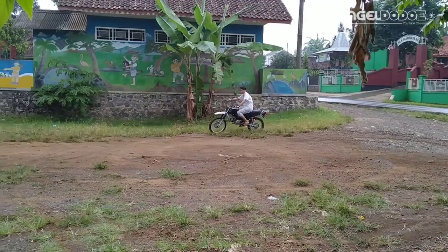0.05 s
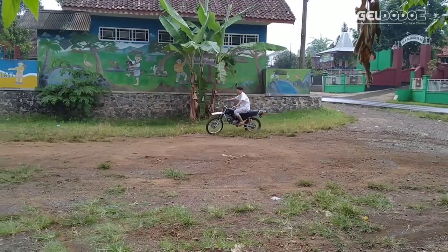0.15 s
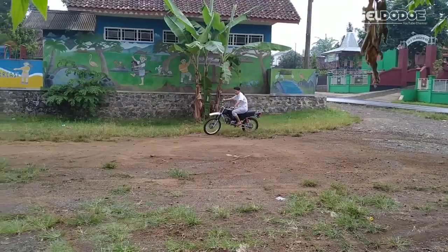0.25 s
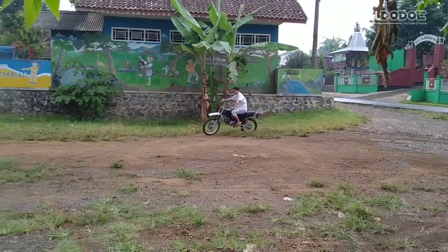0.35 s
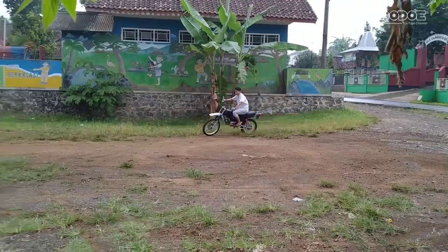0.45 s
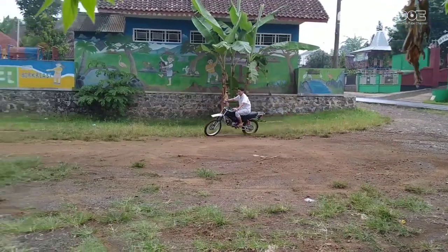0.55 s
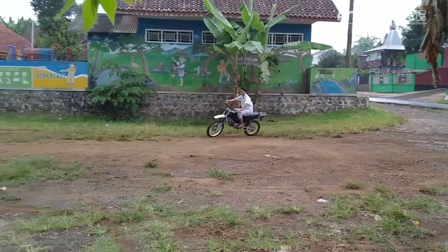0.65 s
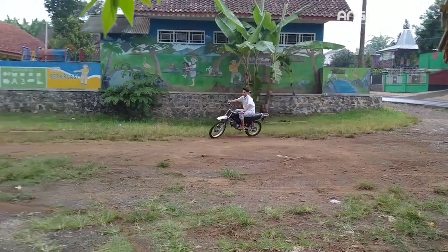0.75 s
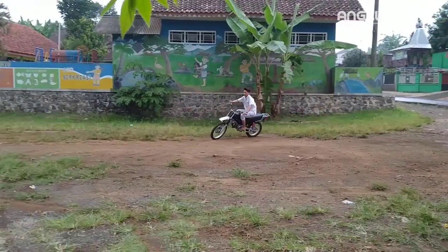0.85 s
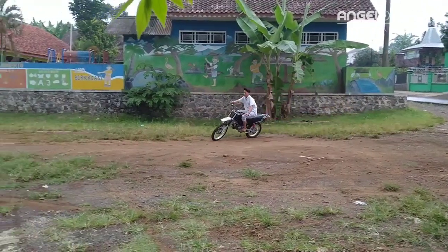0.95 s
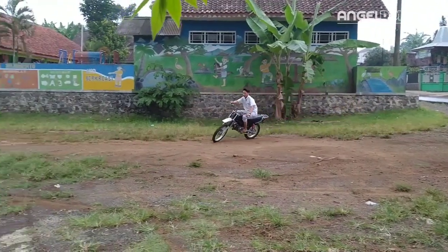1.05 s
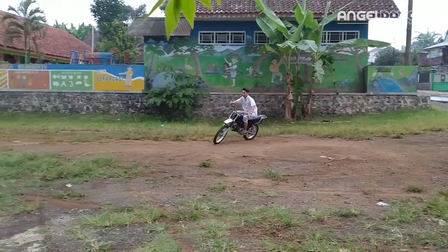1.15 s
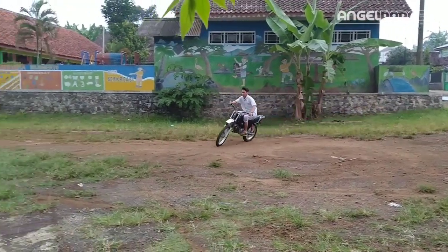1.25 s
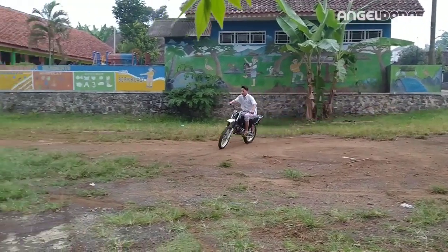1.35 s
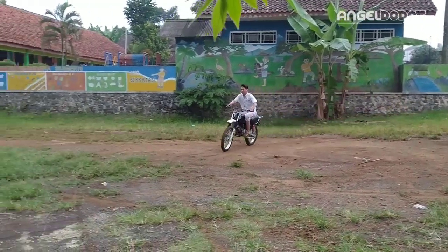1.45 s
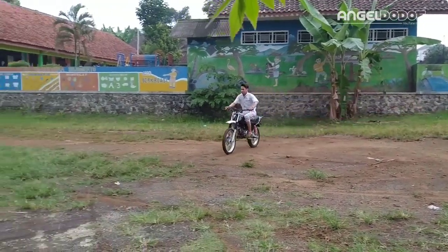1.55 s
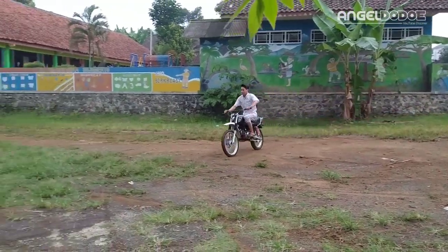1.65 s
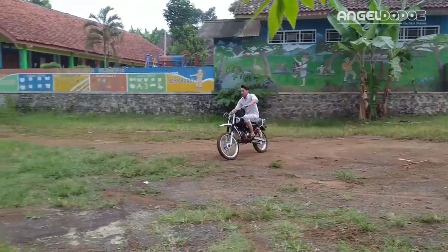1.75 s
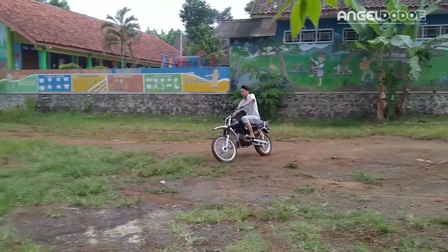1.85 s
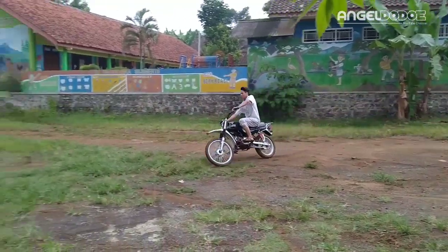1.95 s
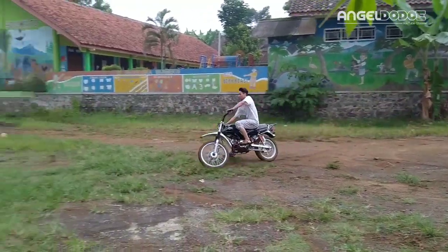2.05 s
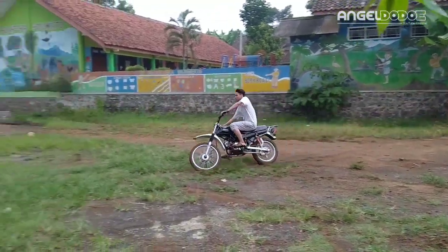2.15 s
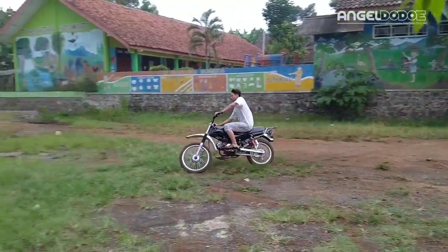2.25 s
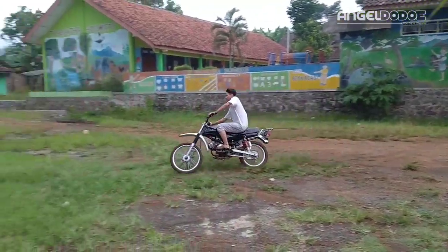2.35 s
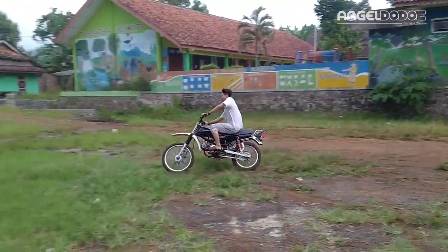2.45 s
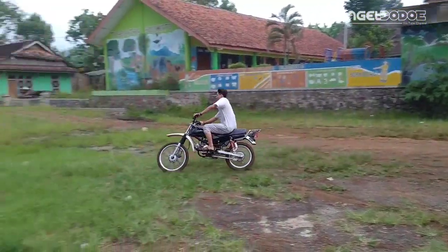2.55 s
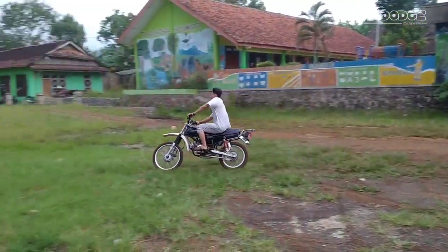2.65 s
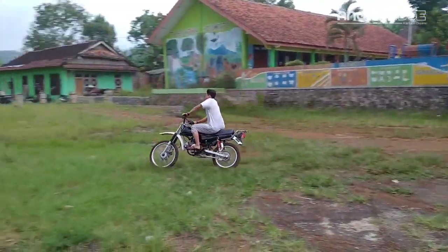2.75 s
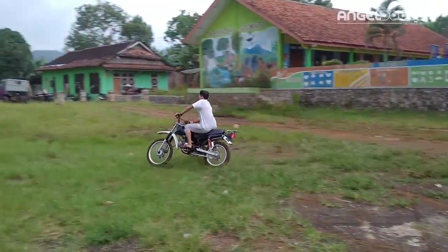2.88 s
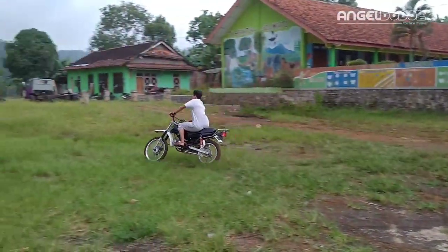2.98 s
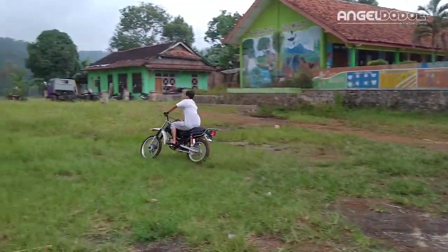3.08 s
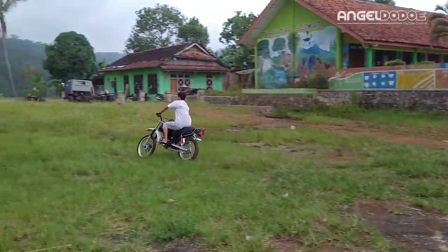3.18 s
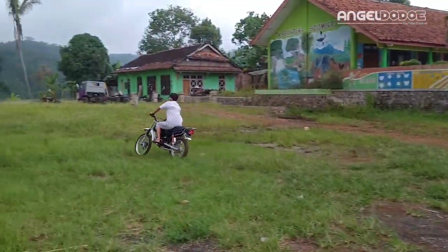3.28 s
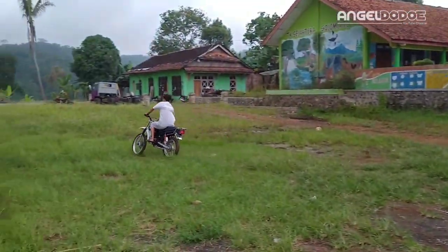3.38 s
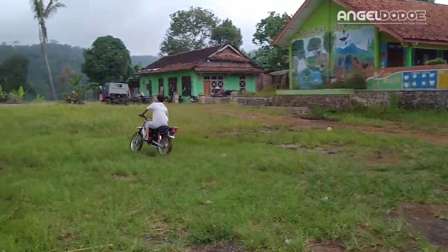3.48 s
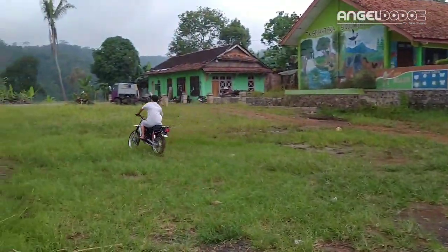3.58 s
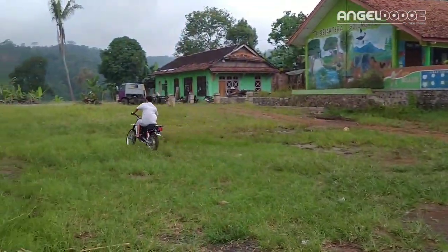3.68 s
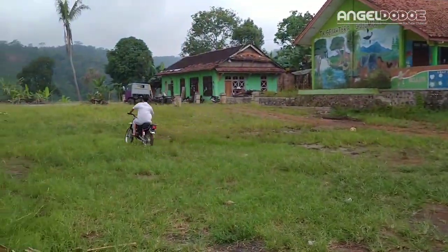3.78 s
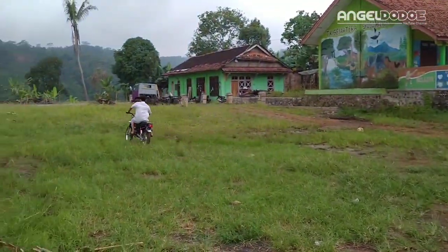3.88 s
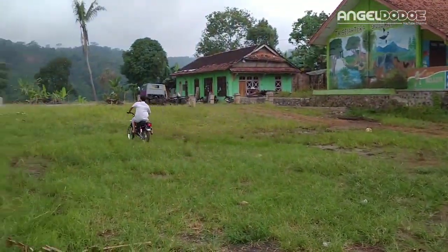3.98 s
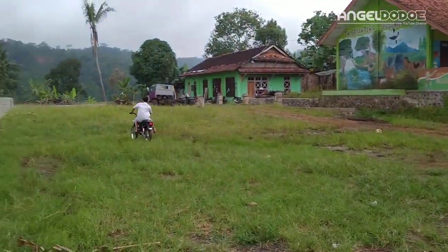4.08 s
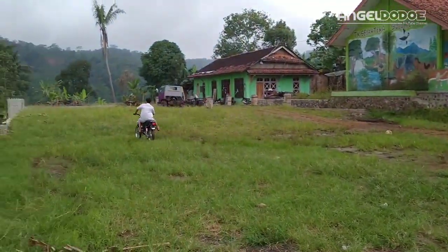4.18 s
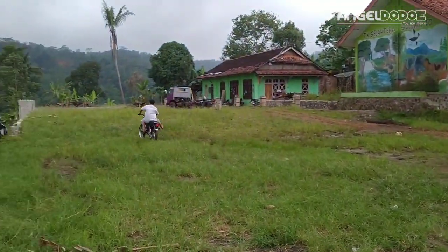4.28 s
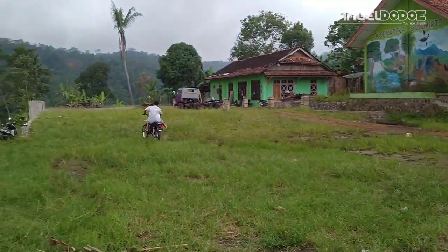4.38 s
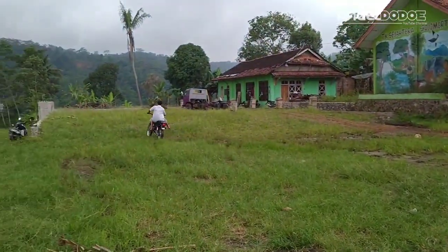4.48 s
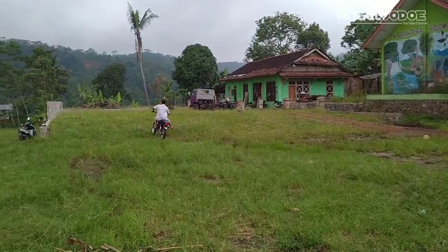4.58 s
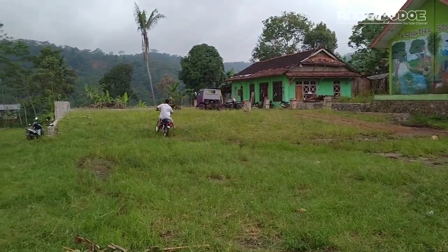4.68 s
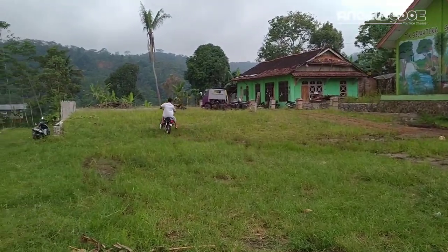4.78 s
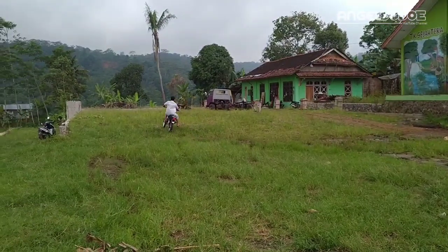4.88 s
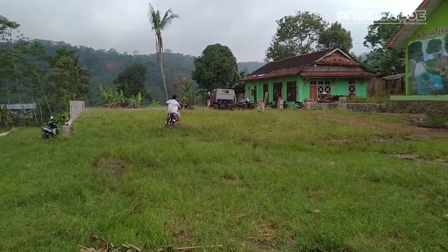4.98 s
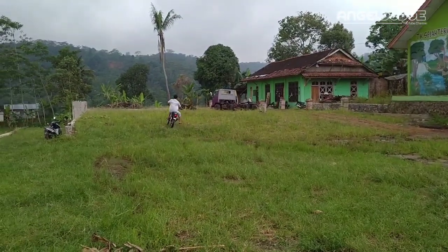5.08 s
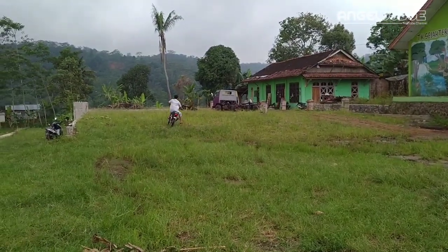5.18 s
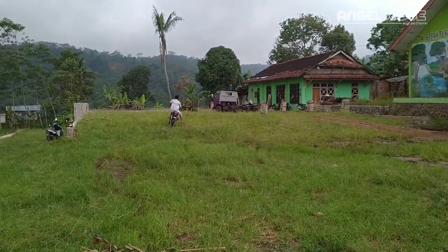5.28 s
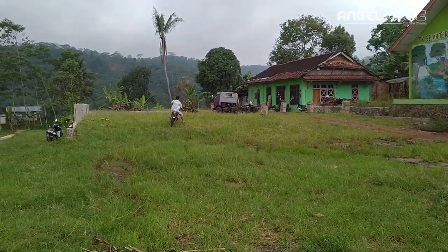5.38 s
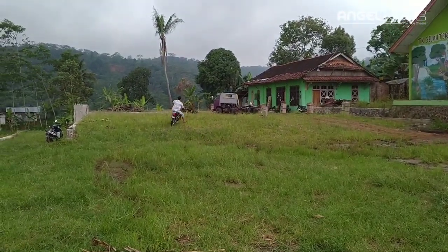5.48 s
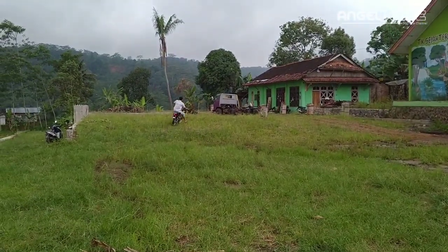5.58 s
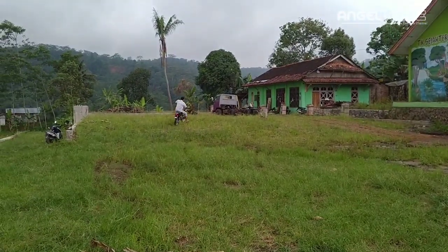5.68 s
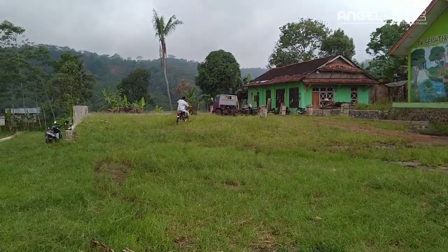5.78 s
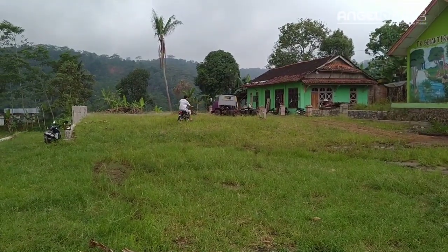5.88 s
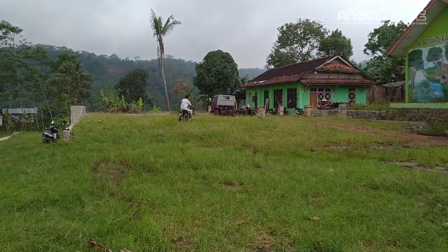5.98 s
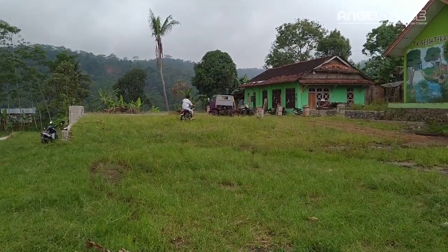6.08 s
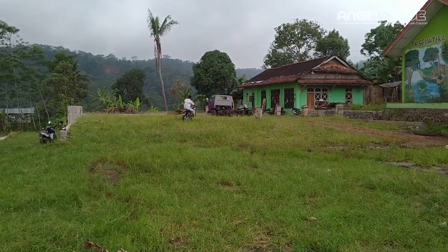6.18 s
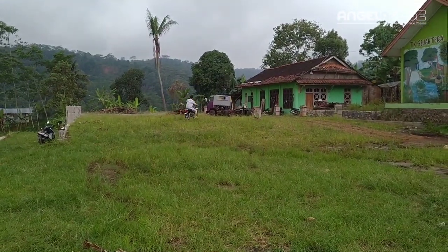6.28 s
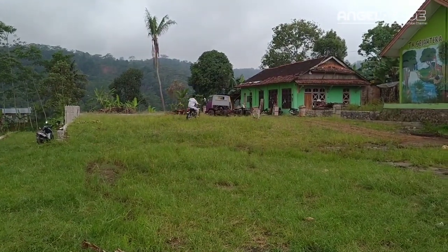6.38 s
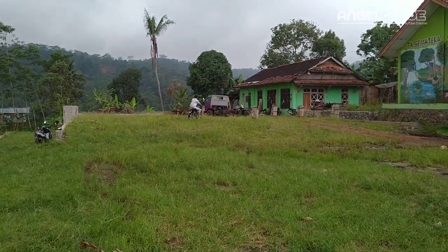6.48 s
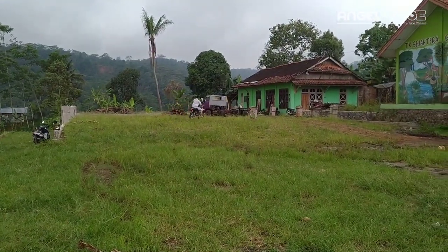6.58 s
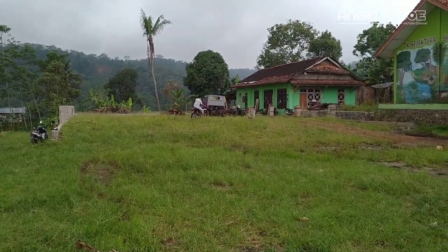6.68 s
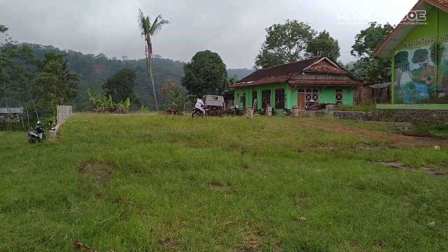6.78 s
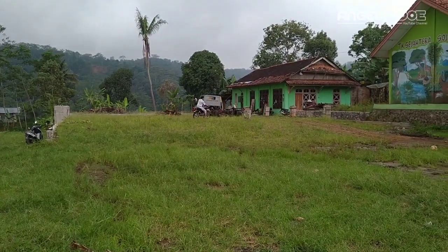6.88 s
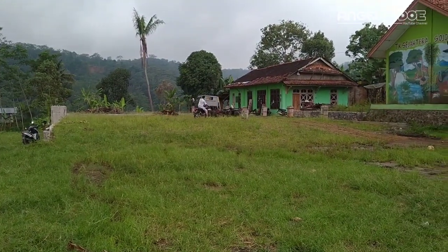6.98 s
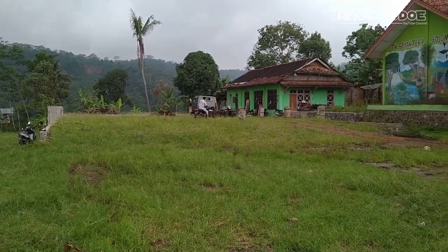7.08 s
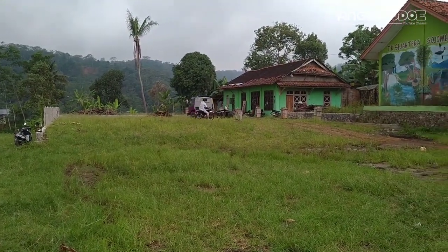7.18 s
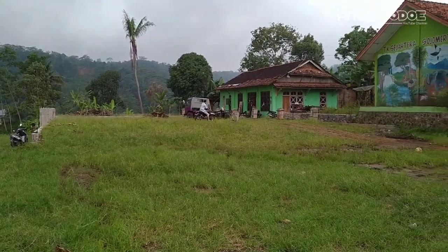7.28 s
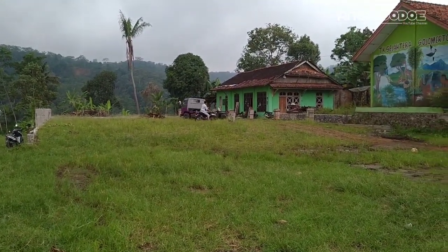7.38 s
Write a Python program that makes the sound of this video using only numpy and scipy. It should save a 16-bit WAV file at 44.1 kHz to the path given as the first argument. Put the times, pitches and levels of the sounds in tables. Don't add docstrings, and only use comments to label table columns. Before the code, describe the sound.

A small single-cylinder trail motorcycle starts already loud, its hard, fast exhaust throb rising to a peak, then surging and easing with throttle pulls. Metallic clatter and spitting gas hiss sound closest in the first three seconds. It then rides away across an open field, snarling in shorter blips, before slowing to a weak putter. Outdoor handheld microphone, slight echo from house walls.

```python
import sys
import numpy as np
from scipy import signal
from scipy.fft import rfft, irfft, next_fast_len
from scipy.io import wavfile
from scipy.ndimage import uniform_filter1d

SR = 44100
rng = np.random.default_rng(int(sys.argv[2]) if len(sys.argv) > 2 else 0)


def master(y):
    cut = np.clip(np.atleast_2d(y).T, -1, 1)
    pcm = np.round(cut * 32767)
    wavfile.write(sys.argv[1], SR, pcm.astype(np.int16))


def convert_level_to_amplitude(level_db):
    exponent = np.asarray(level_db, float) / 20
    return 10 ** exponent


N = 328104
CRUISE = 38
OPEN_S = 0.018


def unit(x):
    return x / np.sqrt(np.mean(x ** 2) + 1e-20)


def along(points, hz):
    f, v = np.transpose(points)
    return np.interp(np.log(hz + 1), np.log(f + 1), v)


def columns(rows, t):
    s, *cols = np.transpose(rows)
    return [np.interp(t, s, c) for c in cols]


def coloured(x, points):
    size = next_fast_len(N + 8192)
    gain = convert_level_to_amplitude(along(points, np.fft.rfftfreq(size, 1 / SR)))
    return irfft(rfft(x, size) * gain, size)[:N]


def noise(points):
    return unit(coloured(rng.standard_normal(N), points))


def band(x, low_hz, high_hz):
    return signal.sosfilt(signal.butter(2, [low_hz, high_hz], "band", fs=SR, output="sos"), x)


def loudness(x):
    power = uniform_filter1d(uniform_filter1d(x ** 2, SR // 12), SR // 12)
    return np.sqrt(np.abs(power) + 1e-9)


def steady(x):
    return x / loudness(x)


def lagged(x, seconds):
    return uniform_filter1d(x, int(seconds * SR), mode="nearest")


def trailing(x, seconds):
    keep = np.exp(-1 / (seconds * SR))
    return signal.lfilter([1 - keep], [1, -keep], x - x[0]) + x[0]


def patchy(x, depth_db):
    z = signal.stft(x, nperseg=512)[2]
    field = uniform_filter1d(uniform_filter1d(rng.standard_normal(z.shape), 3, 0), 5, 1)
    return unit(signal.istft(z * convert_level_to_amplitude(depth_db * unit(field)), nperseg=512)[1][:N])


def blow(cycle, start, length):
    age = (cycle - start) % 1 / length
    return 3 * age * np.exp(-2 * age)


def ring(times, hz, decay_ms, attack_ms, uneven):
    luck = uneven[:, None] * rng.standard_normal((len(times), 2))
    decay = np.clip(decay_ms, 3, 40) / 1000 * np.ones(len(times))
    t = np.arange(int(5 * decay.max() * SR)) / SR
    start = np.ceil(times * SR).astype(int)
    age = t + (start / SR - times)[:, None]
    tone = -np.sin(2 * np.pi * (hz * (1 + .02 * luck[:, 1]))[:, None] * age)
    shape = np.exp(-age / decay[:, None]) * (1 - np.exp(-age * 1000 / attack_ms))
    rings = convert_level_to_amplitude(3 * luck[:, :1]) * tone * shape
    place = start[:, None] + np.arange(len(t))
    return np.bincount(place.ravel(), rings.ravel(), N + SR)[:N]


# t/s, firing rate/(1/s)
WRIST = [(0.0, 33.45), (0.5, 36.57), (0.7, 34.03), (0.97, 38.2), (1.22, 47.04), (1.57, 50.53),
         (1.82, 43.55), (2.03, 35.3), (2.2, 36.22), (2.55, 42.96), (3.0, 43.26), (3.22, 42.1),
         (3.54, 34.87), (3.68, 38.75), (4.13, 32.7), (4.38, 40.71), (4.7, 36.76), (4.88, 37.53),
         (4.995, 36.0), (5.15, 31.37), (5.475, 25.7), (5.72, 38.05), (5.8, 35.36), (6.0, 40.66),
         (6.2, 30.34), (6.44, 28.5), (6.78, 20.2), (7.05, 22.6), (7.44, 23.4)]


def speed():
    return lagged(columns(WRIST, np.arange(N) / SR)[0], .08)


OPENING = [0.99, 1, 0.68, 0.74, 0.64, 0.22, 0.75, 0.69, 0.69, 0.81, 0.77, 0.22, 0.95, 0.3, 0.95, 0.99, 0.92,
           0.99, 0.28, 0.15, 0.91, 0.41, 0.95, 0.85, 0.84, 0.14, 0.3, 0.31, .1]


def throttle(seconds):
    answer_s = 0.01
    move = np.searchsorted(np.transpose(WRIST)[0] + answer_s, np.arange(N) / SR) - 1
    return lagged(np.array(OPENING)[np.clip(move, 0, None)], seconds)


# t/s, pipe level at full throttle/dB, engine block level/dB, tailpipe jet level/dB
RIDE = [(0, -14.5, -43, -53), (.45, -14, -43, -51.5), (1.0, -12.5, -38.5, -48.5), (1.47, -11.5, -34, -48),
        (1.75, -12, -40.5, -48), (2.1, -12.5, -33.5, -46.5), (2.45, -11.5, -32, -48.5),
        (3.05, -12.5, -35, -43.5), (3.4, -10.5, -38.5, -45.5), (4.05, -13.5, -42.5, -49),
        (4.9, -14, -40.5, -47.5), (5.4, -20, -44, -56.5), (5.55, -16.5, -40, -49.5),
        (6.0, -14.5, -41, -54.5), (6.4, -19.5, -40, -51), (6.55, -26.5, -41, -57), (7.0, -28.5, -40, -51.5),
        (7.44, -34, -40.5, -53.5)]
# t/s, tailpipe view/0 hidden-1 in view, silencer flank shown/0-1
TURNED = [
    (0, 0, 0.72),
    (1.2, 0.06, 0.59),
    (1.9, 0.033, 0.48),
    (2.4, 0, 1),
    (2.75, 0, 0.45),
    (3.3, 0.97, 0),
    (4.6, 1, 0.57),
    (6.4, 0.8, 0.54),
    (6.9, 0.52, 0),
    (7.2, 0.59, 0.9),
]
# t/s, boom cancelled/dB, half width/s
CANCEL = [(.54, 12, 0.18), (0.789, 13, 0.073), (1.05, 5, 0.053), (1.24, 1.5, .07), (1.41, 1, 0.037),
          (2.26, 0, .04), (2.87, 0, 0.048), (4.07, 13.5, 0.05), (4.52, 5, 0.075), (4.74, 6, 0.15),
          (5.1, 12, 0.02), (6.02, 22, 0.042), (6.63, 5, .05), (6.82, 5, 0.039), (6.95, -5.5, 0.1),
          (7.07, 10, 0.034)]


def pipe_levels():
    t, opening = np.arange(N) / SR, throttle(OPEN_S)
    pipe_db, (turned, flank) = columns(RIDE, t)[0], columns(TURNED, t)
    shut = 1 - np.maximum(opening, trailing(opening, 0.021))

    def lost(hidden_db, in_view_db):
        return shut * (hidden_db + turned * (in_view_db - hidden_db))

    cancel_db = sum(db * np.clip(1 - np.abs(t - s) / half, 0, 1) for s, db, half in CANCEL)
    fast = np.maximum(speed() - CRUISE, -5)
    second_db = -11 + 7.5 * flank + 0.18 * fast + 0.1 * cancel_db
    bark_db = -14 + 3 * turned + (0.067 + 0.55 * turned) * fast
    return (pipe_db - lost(1.7, 6.1) - cancel_db,
            pipe_db + second_db - lost(3.9, 9.5),
            pipe_db + bark_db - lost(5.2, 24.8))


# cold f/Hz, rise when hot/Hz, rise per firing rate/(Hz s)
BARK_TONE = (465, 61.7, 0.91)


def pipe_tones(times):
    at = np.clip((times * SR).astype(int), 0, N - 1)
    heat = trailing(throttle(OPEN_S), 0.049)[at]
    fast, (turned, flank) = speed()[at] - CRUISE, columns(TURNED, times)

    def pitch(cold_hz, hot_rise_hz, rise_per_rate):
        return (cold_hz + heat * (hot_rise_hz + rise_per_rate * fast)) * (1 - 0.051 * turned)

    open_end_ms = 4.9 * turned * heat
    boom_hz, boom_ms = pitch(145.5, 23.5, 2.1), 13.5 - open_end_ms
    second_hz = pitch(252.5, 61.5, 4.5) + 29.4 * (2 * heat - 1) * (flank - .5)
    second_ms = 18.5 - 0.35 * np.maximum(fast, -5) - open_end_ms
    upper_db = -9 + turned * (0.5 + 6.5 * (1 - heat))
    return boom_hz, boom_ms, second_hz, second_ms, pitch(*BARK_TONE), upper_db


# f/lowest f, level/dB, decay time/ms, gain with tailpipe in view/dB
BARK = [(1.158, 4.5, 8.6, -8.5), (1.311, -1, 8, 6), (1.5, -5, 7.8, -5)]
# t/s, unevenness/0-1
UNEVEN = [(0, .15), (.9, .25), (1.1, .4), (1.5, .3), (1.7, .15), (2.1, .55), (2.6, .38), (3.3, .25),
          (4.1, .12), (4.9, .15), (5.2, .5), (5.6, .25), (6.1, .45), (6.5, .7), (7.44, .7)]


def exhaust(times):
    t = np.arange(N) / SR
    boom_db, second_db, bark_db = pipe_levels()
    boom_hz, boom_ms, second_hz, second_ms, bark_hz, upper_db = pipe_tones(times)
    uneven, turned = columns(UNEVEN, times)[0], columns(TURNED, t)[0]
    boom = band(ring(np.abs(times - .0021), boom_hz, boom_ms, 1.4, uneven), 100, 250)
    second = band(ring(np.abs(times - .0008), second_hz, second_ms, 1.5, uneven), 220, 400)
    upper = sum(convert_level_to_amplitude(db + won_db * turned) * ring(times, ratio * bark_hz, ms, 0.91, uneven)
                for ratio, db, ms, won_db in BARK)
    lowest = ring(times, bark_hz, 6.23, 0.76, uneven)
    bark = band(lowest + convert_level_to_amplitude(np.interp(t, times, upper_db) - 4.5) * upper, 457, 702)
    low_tones = convert_level_to_amplitude(boom_db - 0.65) * steady(boom) + convert_level_to_amplitude(second_db - 2.0) * steady(second)
    return low_tones + convert_level_to_amplitude(bark_db - 0.3) * steady(bark)


# f/Hz, level/dB
VALLEY = [(20, -30), (90, -16), (122, 0), (205, 0), (250, 6), (295, 0), (365, 0), (410, -14), (455, 0)]


def silencer(gas):
    leak = np.clip(0.18 * (speed() - CRUISE), 0, 1)
    return coloured(gas, VALLEY) + leak * band(gas, 367, 454)


# f/Hz, T60/s
WALLS = [(100, 0.46), (600, 0.55), (5000, 0.033)]


def walls(x):
    hz, t, z = signal.stft(rng.standard_normal(SR // 2), SR, nperseg=512)
    decay = convert_level_to_amplitude(-60 * t / along(WALLS, hz)[:, None])
    tail = signal.istft(z * decay, SR, nperseg=512)[1]
    delayed = np.pad(x, (1300, 0))
    return signal.fftconvolve(delayed, tail / np.linalg.norm(tail))[:N]


def rattle_levels():
    _, block_db, jet_db = columns(RIDE, np.arange(N) / SR)
    opening = throttle(OPEN_S)
    shut = 1 - np.maximum(opening, trailing(opening, 0.025))
    return block_db - 4.3 * shut, jet_db - 10.9 * shut, jet_db - 7 - 26 * shut


# f/Hz, level/dB, decay time/ms
COVERS = [(985, 6, 5.2), (1240, 2, 2), (1600, 3.5, 8)]
# t/s, distance/0 near-1 far
DISTANCE = [
    (0, 0.013),
    (3.2, 0.023),
    (4.2, 0.39),
    (5.5, 0.93),
    (7.44, 0.85),
]


def covers(times):
    t = np.arange(N) / SR
    knocks = np.sort(np.r_[times, times[:-1] + .55 * np.diff(times)])
    uneven = np.full(len(knocks), .7)
    metal = sum(convert_level_to_amplitude(db) * ring(knocks, hz * np.ones(len(knocks)), ms, 0.24, uneven) for hz, db, ms in COVERS)
    near = 1 - 0.56 * columns(DISTANCE, t)[0]
    hidden_db = 8.5 * columns(TURNED, t)[0]
    level_db = rattle_levels()[0] - 6.0 - hidden_db + 0.35 * (speed() - CRUISE)
    return convert_level_to_amplitude(level_db) * near * steady(band(metal, 890, 1480))


# f/Hz, level/dB
CLATTER = [(470, -58), (800, -1), (872, -10.5), (973, -10), (1150, -3.5), (1400, -15.5), (1590, -5),
           (1890, -8), (2490, -10.5), (2780, -11.5), (3630, -13), (5200, -30), (6760, -34), (11400, -120)]
# f/Hz, level/dB
FAR_CLATTER = [(470, -10), (800, -23.5), (865, -13.5), (1060, -8), (1250, -2.5), (1820, -3.5), (2130, -0.5),
               (2530, -3), (3030, -10), (3800, -14.5), (5200, -26.5), (6760, -36), (11400, -120)]
# f/Hz, level/dB
HISS = [(3060, -42), (5200, -10), (6220, -9), (6760, -3.5), (7620, 0), (8440, 1.5), (11500, -8),
        (15000, -47), (22000, -120)]
# f/Hz, level/dB
TOP = [(6760, -7), (11500, 2), (14900, 4), (15600, -2)]


def rattle(cycle):
    t = np.arange(N) / SR
    clatter_db, hiss_db, top_db = rattle_levels()
    far = columns(DISTANCE, t)[0]
    sizes = convert_level_to_amplitude(2.5 * rng.standard_normal((int(cycle[-1]) + 2, 3)))
    sizes = sizes[(cycle + .25).astype(int)].T
    metal = np.sqrt(1 - far) * noise(CLATTER) + np.sqrt(far) * noise(FAR_CLATTER)
    open_throttle = np.clip((hiss_db + 60) / 8, 0, 1)
    swell = sizes[0] * blow(cycle, 0.0091, 0.22)
    spit = sizes[1] * blow(cycle, -0.012, 0.13)
    sigh = sizes[2] * blow(cycle, 0.65, 0.26)
    clatter = patchy(metal, 1.58) * steady(0.83 + 1.18 * open_throttle * swell)
    hiss = patchy(noise(HISS), 2.8) * steady(0.77 + open_throttle * (2.2 * spit + 0.62 * sigh))
    top = noise(TOP) * steady(0.32 + open_throttle * (2.4 * spit + 0.62 * sigh))
    return convert_level_to_amplitude(clatter_db + 0.5) * clatter + convert_level_to_amplitude(hiss_db + 0.07) * hiss + convert_level_to_amplitude(top_db + 3.0) * top


# f/Hz, level/dB
RUMBLE = [(20, -17), (42, -4), (58, -11), (90, 4.5), (300, -2), (700, -7), (1100, -41), (1500, -57)]


def turbulence():
    boom_db = pipe_levels()[0]
    return convert_level_to_amplitude(0.73 * boom_db - 24.0) * noise(RUMBLE)


# start t/s, end t/s, f/Hz, level/dB
SQUEAK = (3.325, 3.39, 14650, -60)


def squeak():
    start, end, hz, db = SQUEAK
    t = np.arange(N) / SR
    swell = np.clip(np.minimum(t - start, end - t) / .012, 0, 1)
    return convert_level_to_amplitude(db) * swell * noise([(hz - 150, -40), (hz, 0), (hz + 150, -40)])


def scene():
    t = np.arange(N) / SR
    first_firing = .88
    cycle = np.cumsum(speed()) / SR + 1 - first_firing
    times = np.interp(np.arange(int(cycle[-1]) + 1), cycle, t)
    jitter = .0006 * columns(UNEVEN, times)[0] * rng.standard_normal(len(times))
    times = np.abs(times + jitter)
    pipe = silencer(exhaust(times))
    wet = np.interp(t, [3, 4, 5, 6.3, 6.55, 6.9], [.17, .1, .12, .22, .08, .4])
    echoing = np.sqrt(1 - wet ** 2) * pipe + wet * walls(pipe)
    heard = loudness(pipe) * steady(echoing)
    return (heard + covers(times) + rattle(cycle) + turbulence() + squeak())[None]


def roll_off(x):
    return signal.sosfilt(signal.butter(12, 15700, fs=SR, output="sos"), x)


def record(dry):
    rounded = dry / (1 + np.abs(dry / .75) ** 4) ** (1 / 4)
    return roll_off(rounded)


dry = scene()
out = record(dry)
master(out)
```